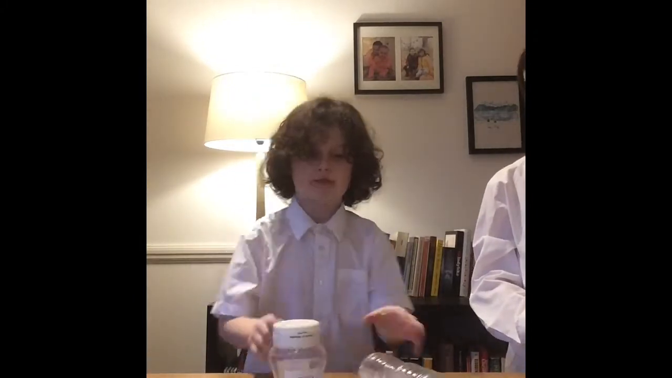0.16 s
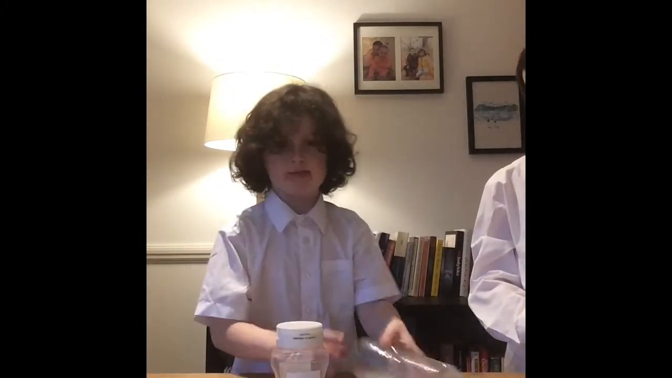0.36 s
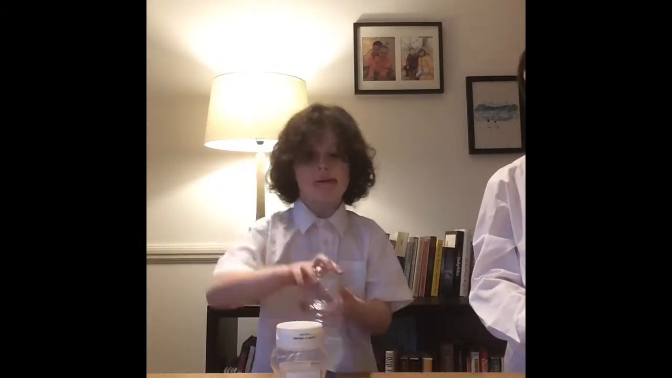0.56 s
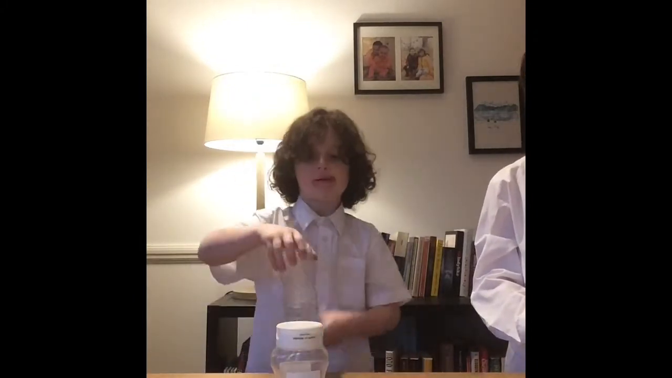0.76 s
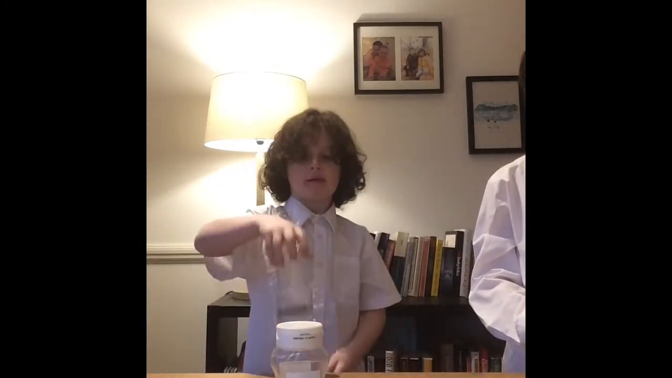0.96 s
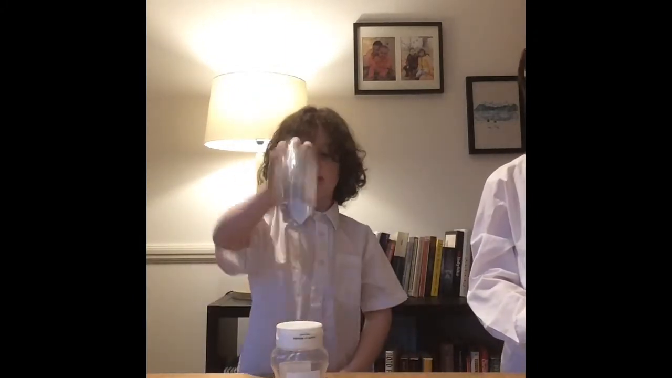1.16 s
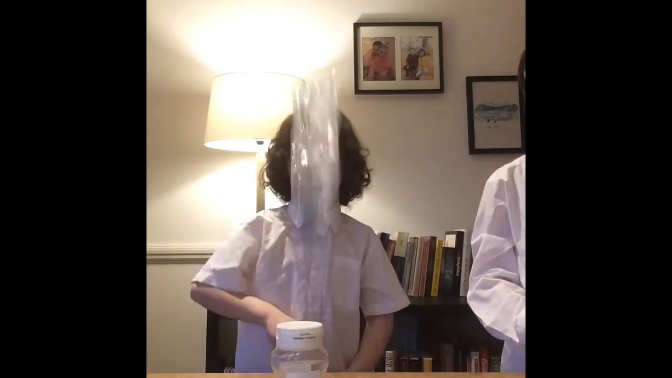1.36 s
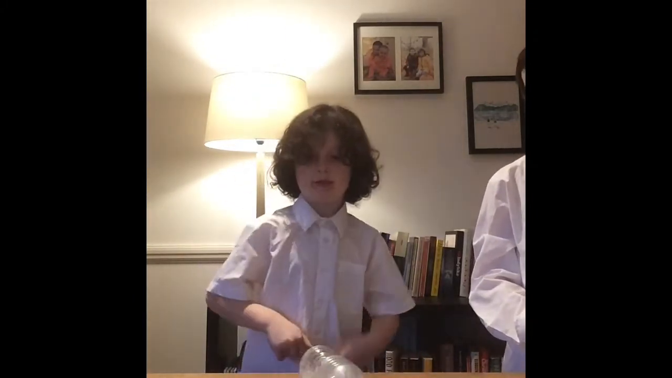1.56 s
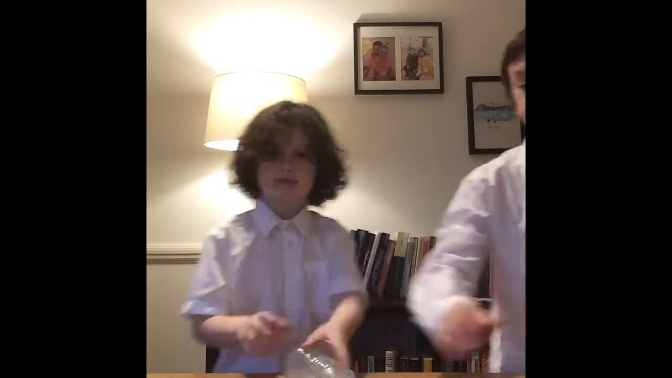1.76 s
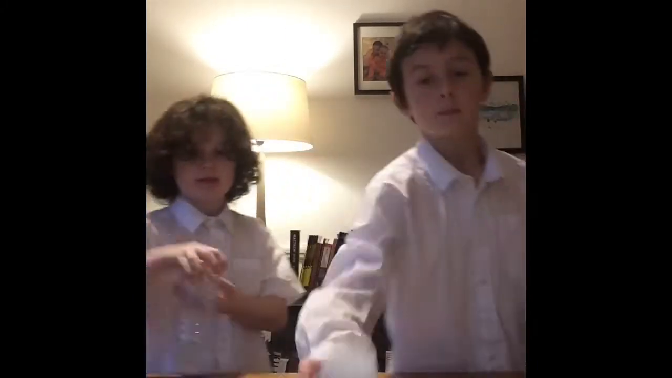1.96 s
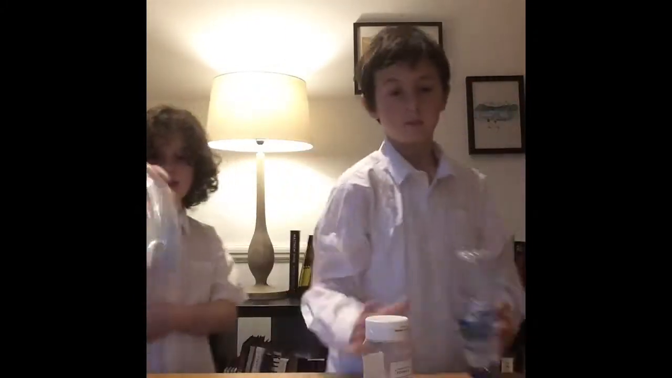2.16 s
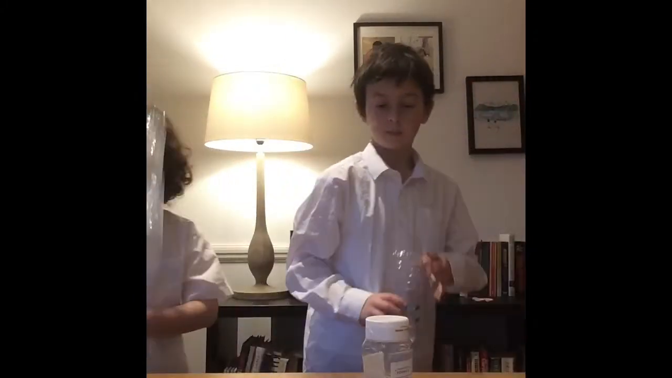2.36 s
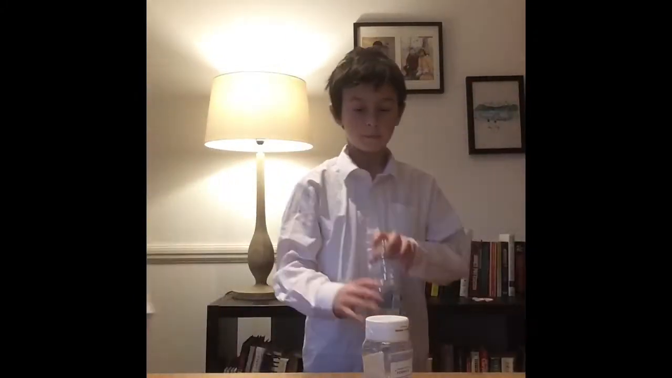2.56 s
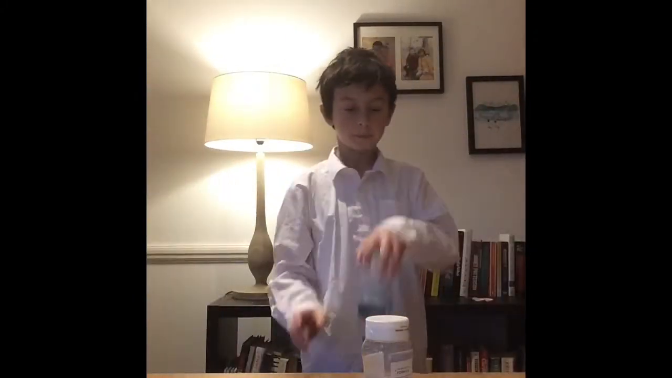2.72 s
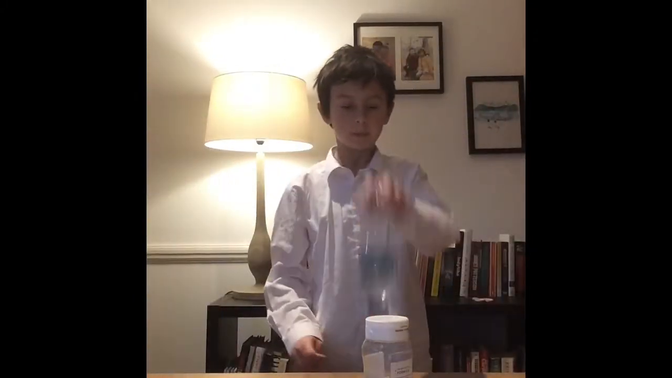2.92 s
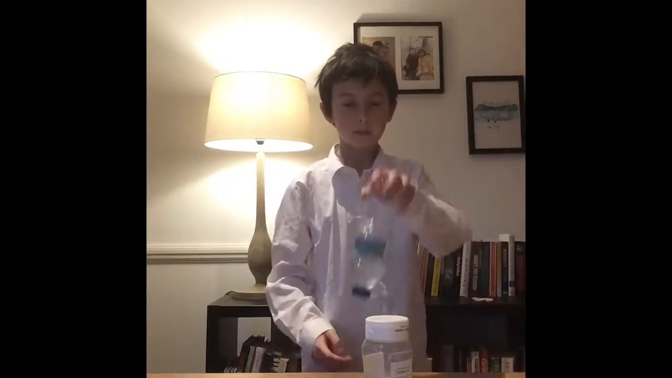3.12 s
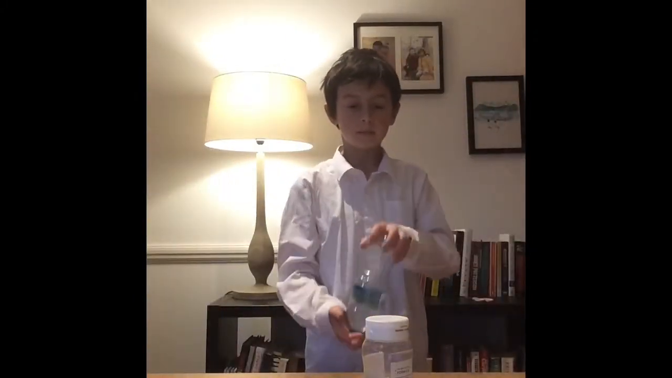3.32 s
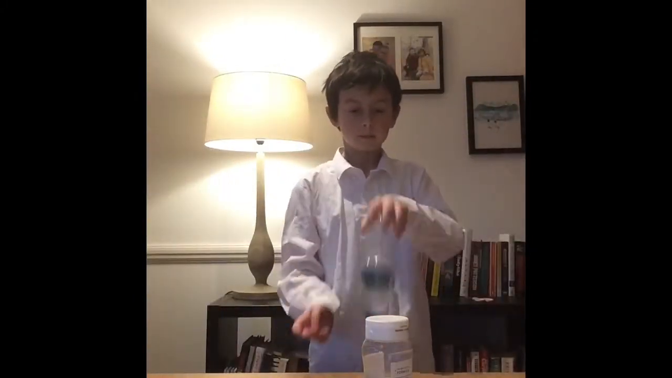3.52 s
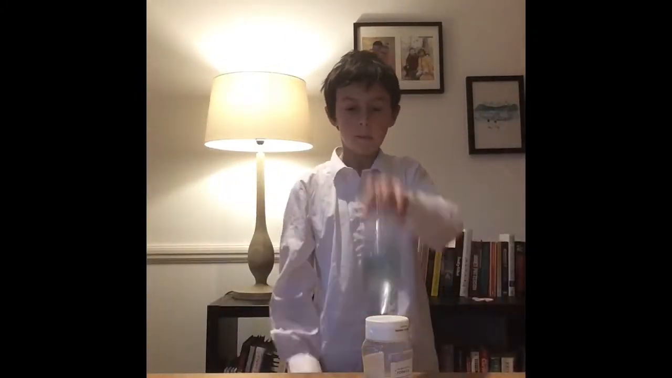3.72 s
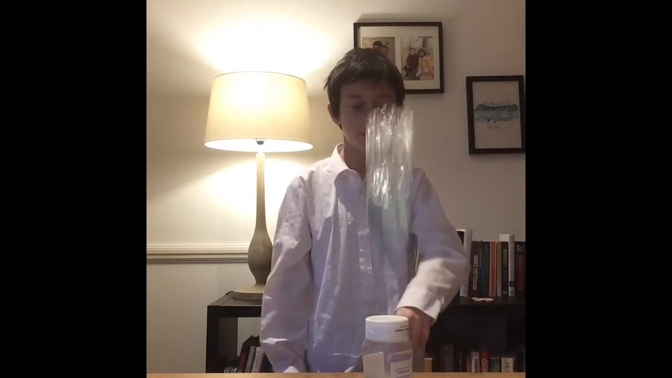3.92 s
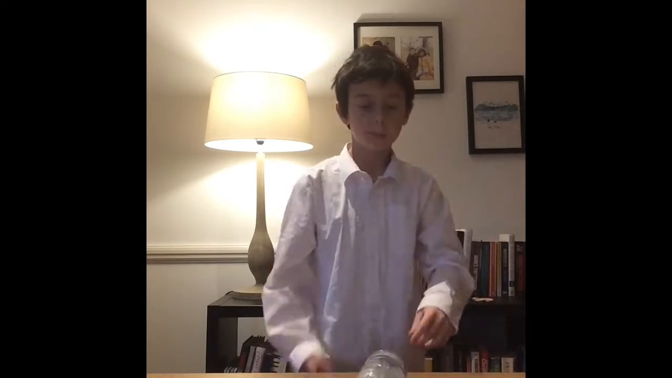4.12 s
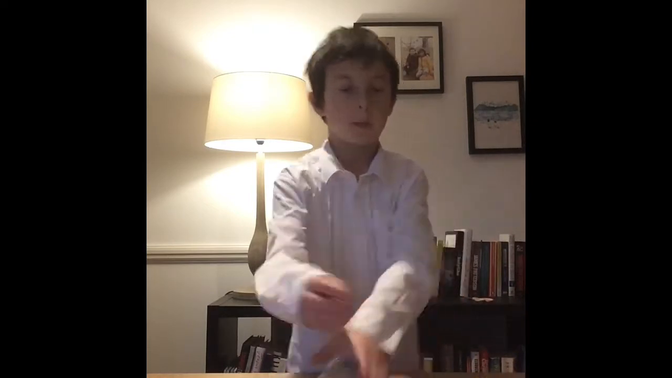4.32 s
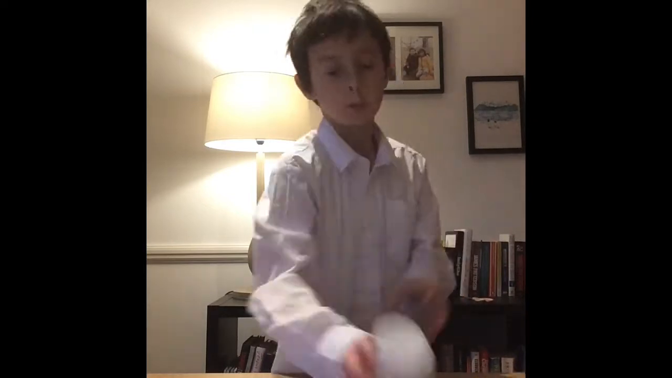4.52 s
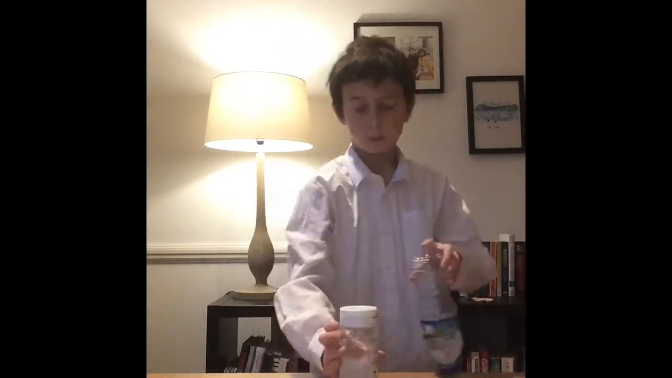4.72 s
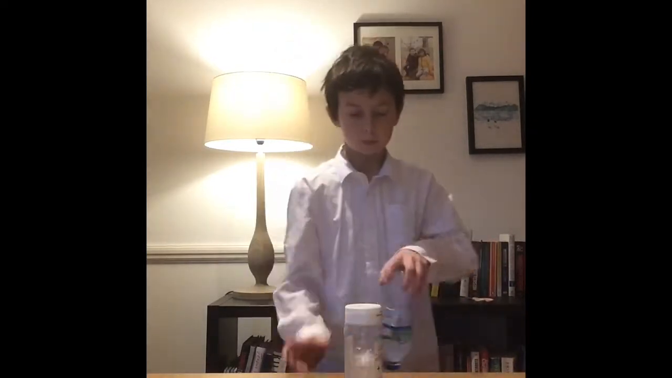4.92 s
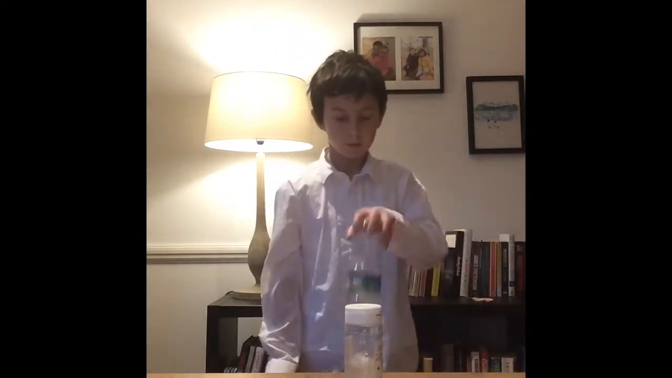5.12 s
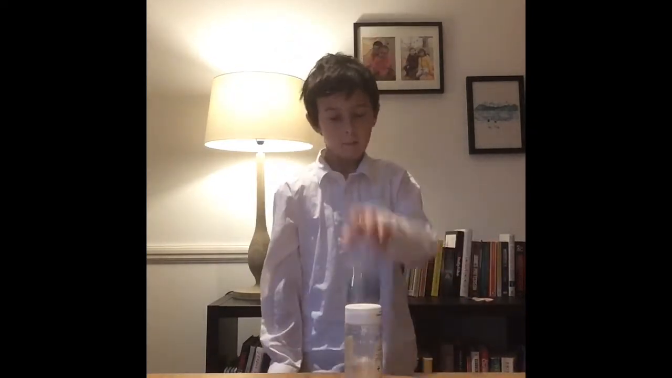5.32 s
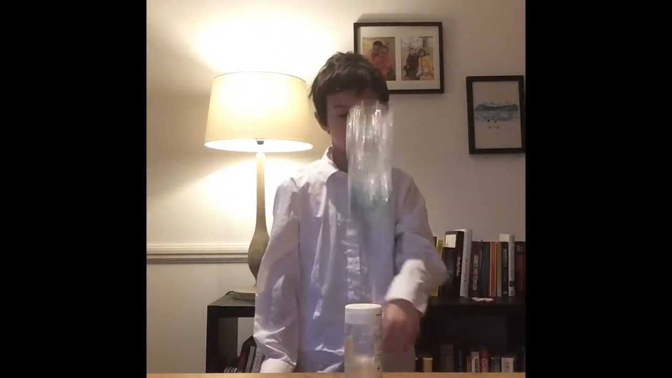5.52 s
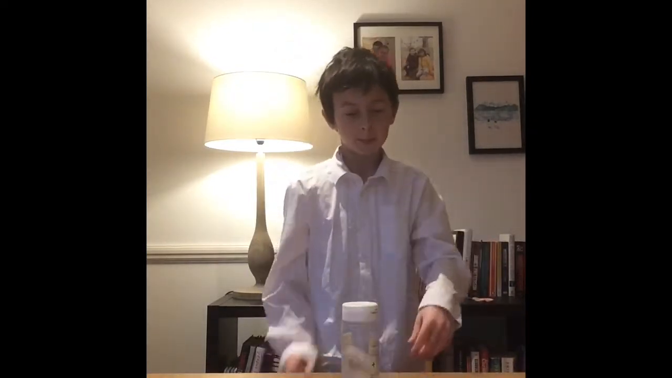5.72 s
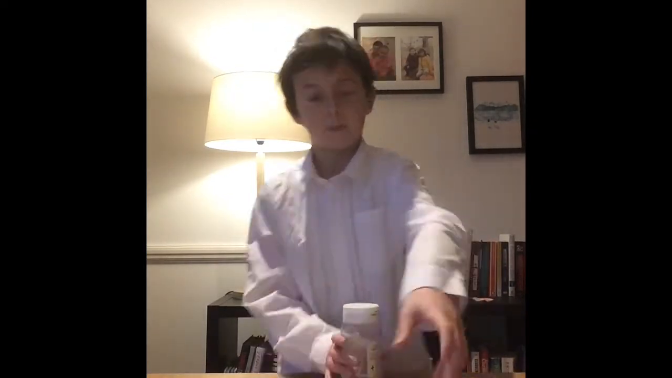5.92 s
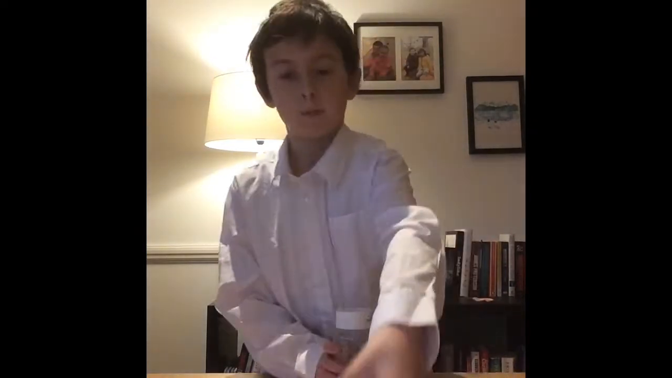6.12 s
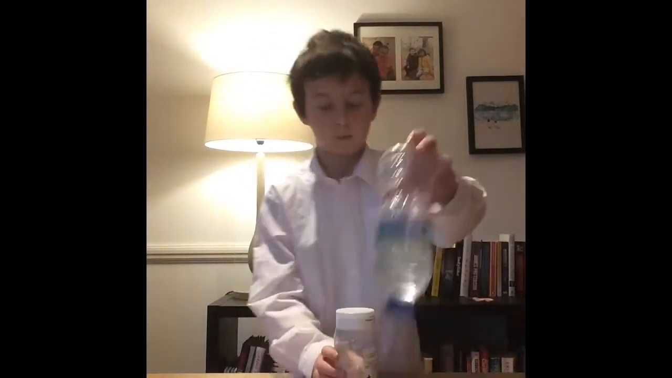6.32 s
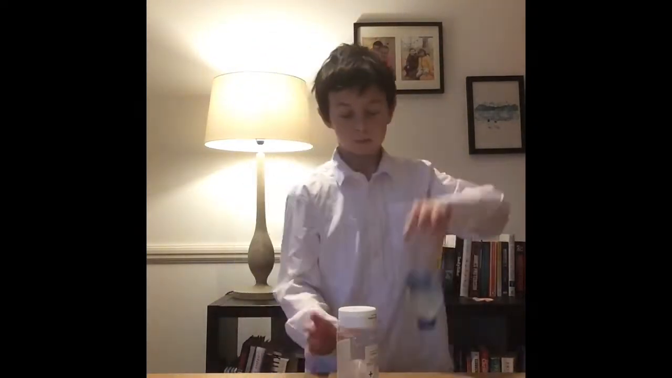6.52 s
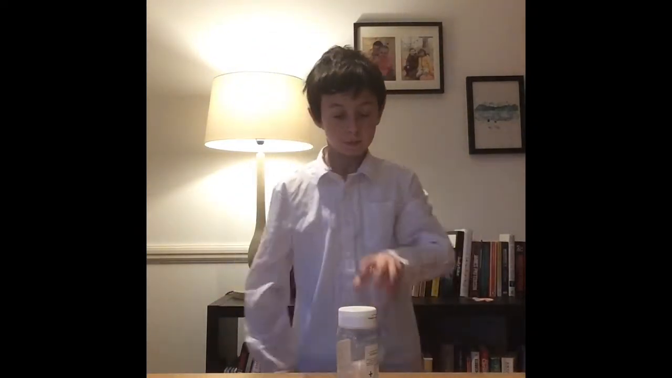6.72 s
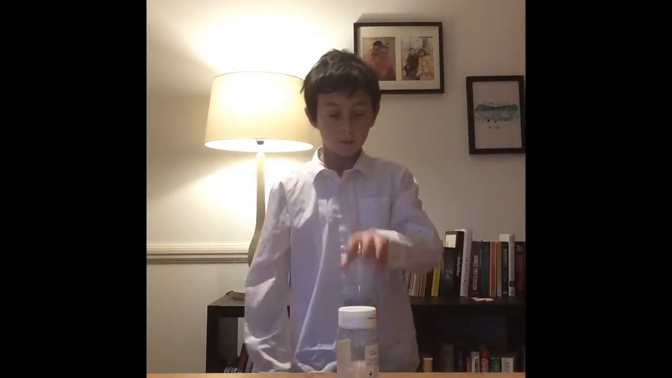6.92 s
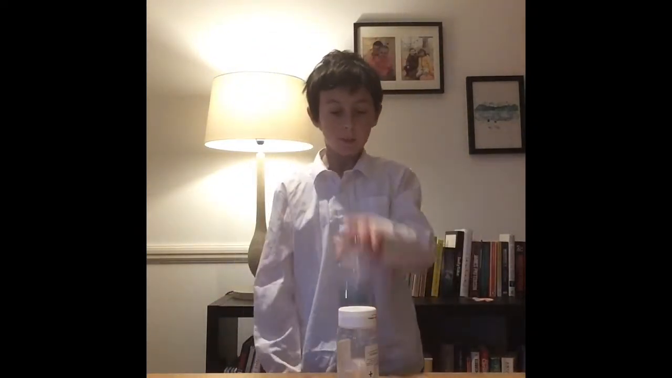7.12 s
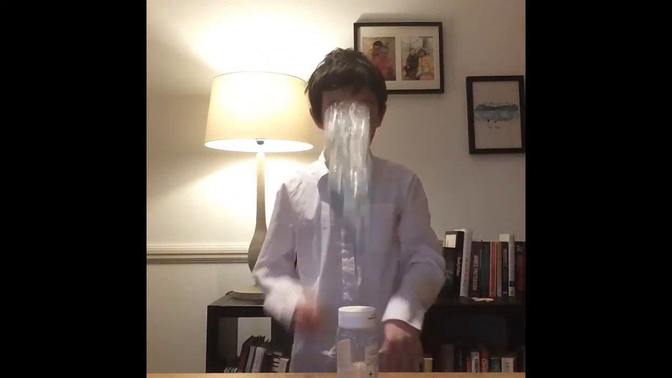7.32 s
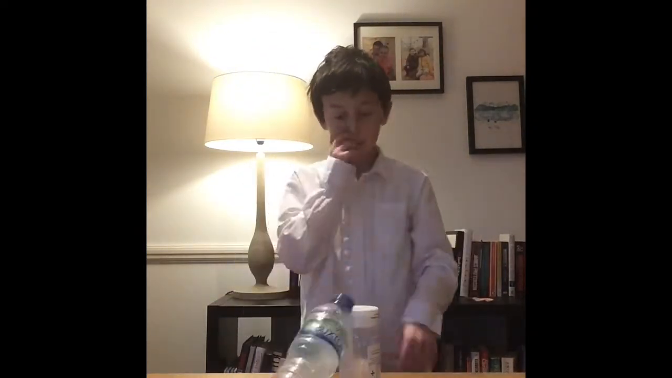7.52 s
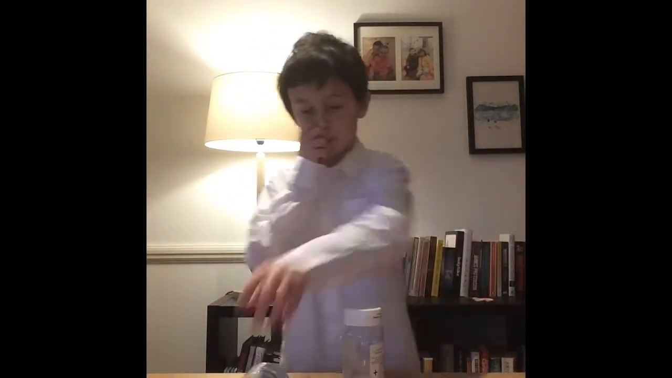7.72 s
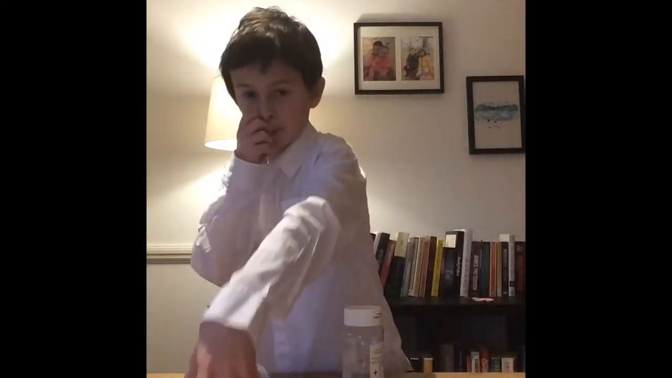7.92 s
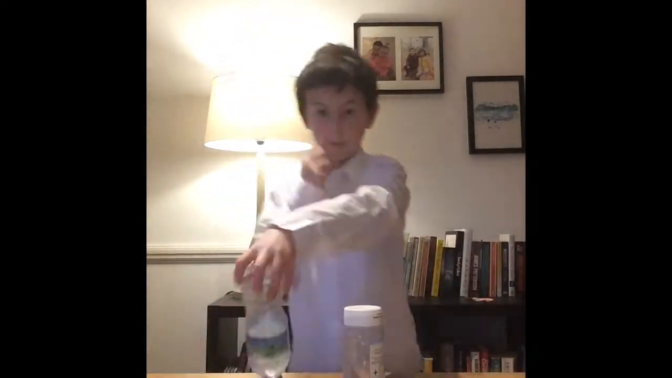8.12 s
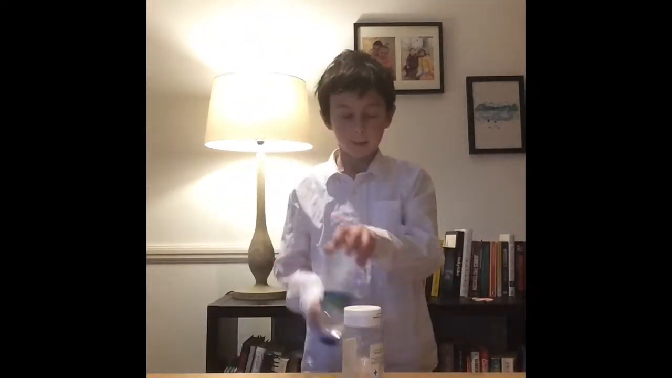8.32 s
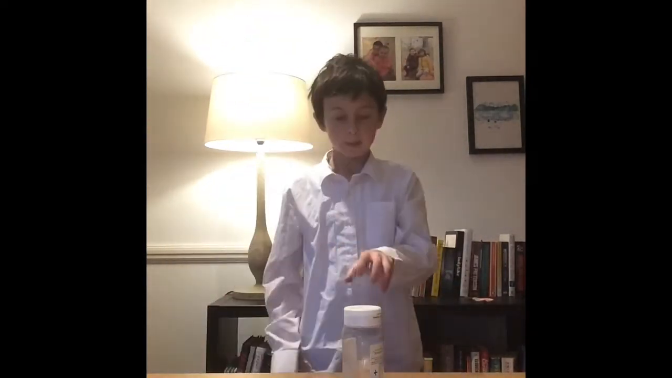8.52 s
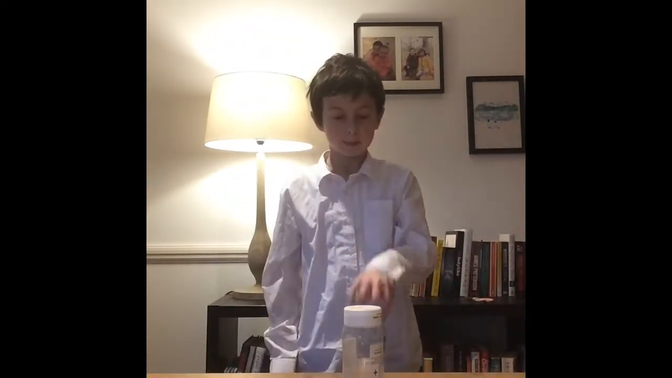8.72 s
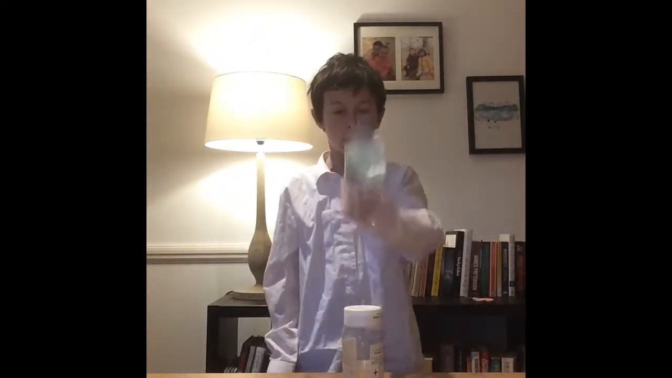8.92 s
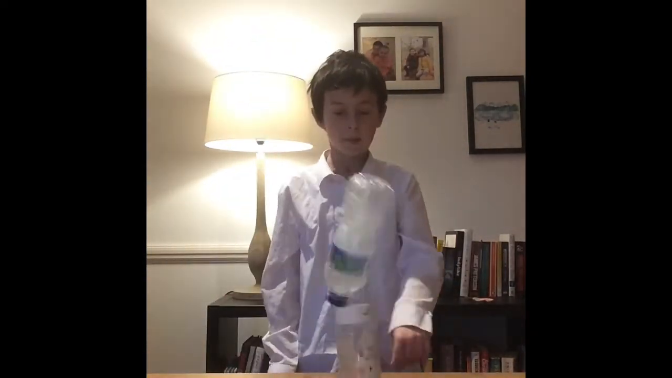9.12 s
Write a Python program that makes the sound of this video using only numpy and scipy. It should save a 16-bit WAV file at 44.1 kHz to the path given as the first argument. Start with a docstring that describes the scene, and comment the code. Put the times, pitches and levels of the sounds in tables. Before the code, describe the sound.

Hard knocks of water bottles on wood, spaced by faint sloshes, small plastic crinkles and soft rustling in a furnished room.

```python
"""A part-filled plastic bottle lands on a wooden table at once: damped modes and tiny shocks thump, knock, crackle.
Hard landings leave something on the table ringing, a faint sine; the bottle rocks, and hands nudge and squeeze it.
Water plips as it settles; at each flip it sloshes, with gulps and splashes of tiny shocks in coloured noise.
Two children flip, land and pick up again in a living room of air noise, hum and echo, the room's decaying noise
tail; as they swap places, floor rumble and sleeve rustle swell and fade."""
import sys
import numpy as np
from scipy import signal
from scipy.fft import rfft, irfft, next_fast_len
from scipy.io import wavfile
from scipy.ndimage import uniform_filter1d, map_coordinates

SR = 44100
rng = np.random.default_rng(int(sys.argv[2]) if len(sys.argv) > 2 else 0)


def put_to_file(sound):
    """Save the sound as 16-bit audio at rate SR, in the file named by the first command-line argument."""
    columns = np.atleast_2d(sound).T  # one column per channel
    safe = np.clip(columns, -1, 1)
    whole_steps = np.round(safe * 32767)
    wavfile.write(sys.argv[1], SR, whole_steps.astype(np.int16))


N = 403956
CLOCK = np.arange(N) / SR  # seconds through the scene
T = np.arange(-SR // 10, SR // 2) / SR  # seconds around one contact

# Contact times are peaks. pitch_hz centres the knock's emphasis; rattle_t60_s is the base decay, scaled per layer.
# thump_db throughout is before a shared trim of -0.6 dB.
# A bottle striking the table or a catching hand:
# start_s, pitch_hz, knock_db, thump_db, clatter_db, crackle_db, rattle_t60_s
LANDINGS = [(0.004, 456, -25, -26, -31.5, -37.5, 0.16), (0.19, 276, -35.5, -38, -40.5, -56.5, 0.077),
            (1.472, 370, -40.5, -52, -41, -42.5, .1), (1.494, 350, -17, -22, -24.5, -30.5, 0.15),
            (1.562, 370, -37, -37, -38, -41, .13), (2.086, 388, -30, -36.5, -39.5, -56, 0.17),
            (2.485, 359.4, -18, -22, -25.5, -32, 0.2), (2.507, 370, -32.5, -38, -27, -32, 0.088),
            (2.946, 740, -18, -35, -28.5, -38.5, 0.15), (4.033, 371, -21.5, -33.5, -25.5, -30.5, .13),
            (4.047, 386, -17, -27, -29.5, -38.5, 0.22), (4.113, 440, -28, -34.5, -29.5, -44.5, .13),
            (5.621, 364, -17, -25.5, -28, -36.5, .11), (5.663, 395, -15.5, -32, -25.5, -35.5, .16),
            (5.795, 376, -33, -44, -41, -48, 0.23), (5.826, 360, -45.5, -45, -61, -57, 0.19),
            (6.227, 467, -37, -48, -61.5, -64, 0.14), (7.421, 365, -22, -28.5, -34, -37.5, 0.11),
            (7.435, 337, -19.5, -25.5, -33.5, -40, 0.15), (7.541, 293, -35, -37, -41, -48, 0.23),
            (7.657, 370, -31.5, -39.5, -31.5, -40, .14), (7.741, 384, -28.5, -26.5, -44, -59, 0.14),
            (9.158, 704, -24.5, -32, -29.5, -35.5, .13)]
# A fallen bottle rocking to rest; levels of the first contact, then the loss per further contact:
# start_s, pitch_hz, knock_db, thump_db, clatter_db, crackle_db, gap_s, loss_db
ROCKING_BOTTLES = [(0.229, 600, -36, -37.5, -45.5, -59, .038, 6.7),
                   (1.614, 440, -24, -30.5, -29.5, -45, .031, 6.2),
                   (4.16, 400, -32.5, -34.5, -45.5, -56, 0.037, 7.1),
                   (4.661, 328, -35.5, -37.5, -51.5, -65, .03, 3.4),
                   (7.584, 338, -34.5, -49, -45, -57.5, .021, 2.8)]
# Hands nudging and lifting a bottle off the wood: start_s, pitch_hz, knock_db, thump_db, crackle_db
HAND_NUDGES = [(0.485, 393, -43.5, -72, -79), (0.527, 403, -50, -71, -69), (0.622, 270, -56.5, -61, -93),
               (1.875, 312, -49.5, -48, -69), (1.945, 516, -45.5, -49.5, -85), (1.98, 397, -47.5, -52, -67),
               (2.13, 348, -50, -55, -63), (2.272, 379.6, -52.5, -65, -67.5),
               (4.48, 392, -69.5, -49.5, -82), (4.552, 736, -45.5, -68, -75), (4.581, 350, -42, -59, -66.5),
               (8.03, 566, -47.5, -58, -90.5), (8.63, 379, -62, -71, -81), (8.724, 432, -51.5, -53.5, -68)]
# Fingers crinkling the thin wall: start_s, crackle_db
WALL_SQUEEZES = [(1.9, -64.5), (2.03, -57.5), (2.328, -58), (2.683, -65.5), (3.09, -65.5), (6.31, -65),
                 (8.191, -63), (8.401, -67.5)]
# A flick slapping the water about inside the bottle; levels of the first slap, gap between slaps:
# start_s, gulp_db, splash_db, gap_s
WATER_FLIPS = [(1.259, -45, -60.5, 0.036), (3.859, -51.5, -60, 0.038), (5.468, -55.5, -61.5, 0.021),
               (7.274, -51, -58.5, 0.023), (8.995, -52.5, -61.5, .037)]
# Small plips of the water settling: start_s, pitch_hz, level_db
WATER_PLIPS = [(0.531, 5330, -66), (3.133, 1955, -58.5), (3.944, 1750, -57.5), (6.214, 2810, -57),
               (7.358, 2890, -58), (5.32, 2780, -76.5), (7.396, 4310, -54), (7.809, 3840, -69),
               (8.365, 3330, -64.5)]
# Hard landings that set something on the table ringing: start_s, level_db (peak)
TABLE_RINGS = [(0, -54), (2.485, -55), (4.041, -45.5), (5.661, -48.5), (7.42, -49)]
# Children stepping and reaching; the span held at full level: start_s, length_s, rumble_db, rustle_db
CHILD_MOVES = [(0.1, 0.31, -73, -64), (1.9, 1.2, -58, -66.5), (4.45, .35, -71, -66),
               (5.896, .35, -63, -65.5), (7.95, 0.32, -68, -69), (8.62, 0.17, -73, -70.5)]

# Ringing modes, strength relative within a set, decay before each contact's damping: mode_hz, level_db, t60_s
# Bending of the table top
TABLE_MODES = [(64.4, -18.5, .2), (128, -0.5, 0.27), (162.4, -6.5, 0.32), (204, -2, 0.051)]
# A bottle on the wood
KNOCK_MODES = [(237.9, 2.5, 0.1), (307, 5.5, 0.044), (376, 3, 0.081), (440, -1.5, 0.047), (548, -6, 0.059),
               (586, -8, 0.18), (648, -3.5, .08), (829, -8.5, 0.088)]
# The thin bottle wall
WALL_MODES = [(962, 3.5, 0.069), (1069, 2, 0.1), (1335, -3.5, 0.23), (1574, -4.5, .09), (1874, -5, 0.18),
              (2660, -6, .11), (2790, -1.5, 0.28), (3163, -2.5, 0.21)]
# The stiff ribs and base
RIB_MODES = [(3650, 0, .09), (3980, -1, .09), (4400, -3, .08), (4870, -3, .09), (5580, -7, .08)]

# Noise colours, only the shape counts: frequency_hz, gain_db
# The table's thud
THUD_COLOUR = [(20, -26), (50, -11.5), (80, -0.5), (130, -5), (210, -2.5), (330, -22.5), (700, -58)]
# The water's knock
WATER_KNOCK_COLOUR = [(110, -32), (220, -1), (400, -1), (650, -7.5), (950, -6), (1600, -32)]
# The wall's clatter
CLATTER_COLOUR = [(450, -48.5), (700, -2.5), (850, -6), (1400, -2.5), (1900, -4.5), (2800, -4),
                  (3500, -7.5), (4600, -44)]
# The crackle
CRACKLE_COLOUR = [(2400, -44), (3400, 3), (4000, 1), (4900, -0.5), (5300, -2), (8000, -3), (11000, -8),
                  (14000, -14.5), (16000, -21.5)]
# The water's gulp
GULP_COLOUR = [(120, -31), (280, -4), (420, 3), (560, -9), (800, -21), (1500, -49.5)]
# Still air
AIR_COLOUR = [(15, -30), (30, -17.5), (70, -13.5), (110, -12.5), (170, -14.5), (400, -25.5), (900, -34.5),
              (1500, -31.5), (4500, -36.5), (11000, -38.5), (15500, -46)]
# Footfalls through the floor
RUMBLE_COLOUR = [(20, -9), (52, -0.5), (70, -2), (90, 1), (130, 1), (220, -14), (500, -24), (1200, -55)]
# Rustling sleeves
CLOTH_COLOUR = [(150, -5.5), (350, 2.5), (900, -5.5), (2000, -10.5), (3800, -14.5), (7000, -19.5),
                (15000, -25.5)]

# Room hum: tone_hz, level_db (rms)
HUM_TONES = [(97, -72), (129, -79.5)]
# Decay of the furnished room: frequency_hz, t60_s
ROOM_DECAY = [(100, 0.38), (300, 0.34), (1000, 0.18), (4000, 0.31), (14000, 0.1)]

TOP_HZ = 15700  # centre of the recorder's upper band limit
AIR_DB, REST_RUSTLE_DB, ROOM_DB = -71.5, -76, -23.5  # still air; sleeves between moves; room tail gain
MOVE_RISE_DB_PER_S, MOVE_FALL_DB_PER_S = 38.5, 26
RING_HZ, RING_T60_S = 527.6, 1.5
THUMP_TRIM_DB = -0.6
TILT_DB, TILT_GROWS = -1, 0.28  # clatter dB per octave at crackle = clatter; change per dB of crackle
EDGE_HZ, EDGE_HALVES_DB = 6500, 16  # clatter's upper edge at crackle = clatter; this much less crackle halves it
DENT_DB, DENT_SPACING_HZ, DENT_FADE_HZ = 3.5, 127.3, 5000  # ripple size and spacing; it evens out above the last
ROCK_T60_S, NUDGE_T60_S, SQUEEZE_T60_S = 0.19, 0.19, 0.15  # base rattle decays
SOFTEN_DB = 2.5  # extra crackle loss at each further rock
NUDGE_CLATTER_DB = -14.5  # over the knock
SQUEEZE_HZ = 420  # centre of the knock's emphasis
SQUEEZE_KNOCK_DB, SQUEEZE_THUMP_DB, SQUEEZE_CLATTER_DB = -0.5, 1, 1.5  # over the crackle
BUBBLE_LEAD_S, BUBBLE_HZ, BUBBLE_DB = 0.011, 2955, -3.5  # ahead of first slap; middle pitch; over the splash
GULP_LOSS_DB, SPLASH_GAIN_DB, SPRAY_DB = 7.5, 0.26, -1  # per further slap, twice; spray over the splash


def amp(db):
    """Decibels to gain."""
    return 10 ** (np.asarray(db) / 20)


def unit(x):
    """Scale to rms 1."""
    return x / np.sqrt(np.mean(x ** 2) + 1e-20)


def level(sound):
    """Scale to rms 1 around the moment of contact."""
    core = (T > -0.006) & (T < 0.010)
    return sound / np.sqrt(np.mean(sound[core] ** 2) + 1e-20)


def along(points, hz):
    """Read (Hz, value) points on a log frequency axis."""
    f, v = np.transpose(points)
    return np.interp(np.log(hz + 1), np.log(f + 1), v)


def filtered(x, response):
    """Shape x by a response of frequency."""
    m = next_fast_len(len(x) + SR // 10)
    spectrum = rfft(x, m) * response(np.fft.rfftfreq(m, 1 / SR))
    return irfft(spectrum, m)[:len(x)]


def coloured(x, colour):
    """Shape x by a (Hz, dB) colour."""
    return filtered(x, lambda f: amp(along(colour, f)))


def add(track, s, sound, db):
    """Mix in a sound whose contact falls at time s, with db the rms around that contact."""
    start = round((s + T[0]) * SR)
    lo, hi = max(start, 0), min(start + len(T), N)
    track[lo:hi] += amp(db) * level(sound)[lo - start:hi - start]


def swell(rise, t60):
    """An envelope that grows to a peak at the moment of contact and dies away."""
    return amp(-60 * np.where(T < 0, np.abs(T / rise) ** 1.08, T / t60))


def background():
    """Still air and hum; each move swells, holds and fades in footfall rumble and rustling sleeves."""
    rumble = np.zeros(N)
    rustle = np.full(N, amp(REST_RUSTLE_DB))
    for s, length, rumble_db, rustle_db in CHILD_MOVES:
        rise_db = MOVE_RISE_DB_PER_S * (CLOCK - s)
        fall_db = MOVE_FALL_DB_PER_S * (s + length - CLOCK)
        fade_db = np.minimum(0, np.minimum(rise_db, fall_db))
        rumble = np.maximum(rumble, amp(rumble_db + fade_db))
        rustle = np.maximum(rustle, amp(rustle_db + fade_db))
    noise = lambda colour: unit(coloured(rng.standard_normal(N), colour))
    hum = sum(amp(db) * np.sqrt(2) * np.sin(2 * np.pi * hz * CLOCK) for hz, db in HUM_TONES)
    return amp(AIR_DB) * noise(AIR_COLOUR) + hum + rumble * noise(RUMBLE_COLOUR) + rustle * noise(CLOTH_COLOUR)


def ringing():
    """A faint lasting tone: each hard landing adds fresh energy that decays exponentially."""
    envelope = np.zeros(N)
    for s, db in TABLE_RINGS:
        envelope += amp(db - 60 * np.abs(CLOCK - s) / RING_T60_S) * (CLOCK > s)
    return envelope * np.sin(2 * np.pi * RING_HZ * CLOCK)


def ring(modes, rise, detune, sustain, weight=lambda hz: 0):
    """Damped modes, a little different in pitch, strength and phase at each contact."""
    out = np.zeros(len(T))
    draws = rng.standard_normal((len(modes), 3))
    for (hz, db, t60), (strength, pitch, phase) in zip(modes, draws):
        tone = np.sin(2 * np.pi * hz * (1 + detune * pitch) * T + phase)
        out += amp(db + weight(hz) + 1.4 * strength) * swell(rise, t60 * sustain) * tone
    return level(out)


def crumple(colour, rise, t60, grain_db, snap=0):
    """Many tiny shocks of water and thin plastic, around one firm snap if asked for."""
    grain = unit(uniform_filter1d(rng.standard_normal(len(T)), size=24))
    shocks = swell(rise, t60) * amp(grain_db * grain) * rng.standard_normal(len(T))
    impulse = snap * (T == 0)
    return level(coloured(shocks / np.linalg.norm(shocks) + impulse, colour))


def dented(x):
    """Each contact dents the wall differently, giving it its own close resonances."""
    knots = rng.standard_normal(400)
    ripple = lambda f: map_coordinates(knots, [f / DENT_SPACING_HZ], mode="mirror")
    return filtered(x, lambda f: amp(DENT_DB * ripple(f) / (1 + (f / DENT_FADE_HZ) ** 2)))


def table_thump(rise, t60, loose, grain_db):
    """The table top bends in a few low modes under a loose thud."""
    bending = ring(TABLE_MODES, rise * 0.65, detune=0.0093, sustain=0.93)
    return bending + 0.58 * loose * crumple(THUD_COLOUR, rise, t60 * 1.4, grain_db)


def bottle_knock(pitch, rise, t60, sustain, loose, grain_db, snap, focus_db):
    """The spot that is struck picks which modes of bottle and water speak."""
    spot = lambda hz: -focus_db * np.log2((hz + 1) / pitch) ** 2
    water = crumple(WATER_KNOCK_COLOUR, rise, t60, grain_db, snap)
    water = level(filtered(water, lambda f: amp(spot(f))))
    return ring(KNOCK_MODES, rise, detune=0.013, sustain=sustain, weight=spot) + loose * water


def wall_clatter(hardness_db, rise, t60, sustain, grain_db, snap, wall):
    """The thin wall rattles; hard contact brightens it, soft contact dulls it."""
    tilt_db = TILT_DB + TILT_GROWS * hardness_db
    edge_hz = EDGE_HZ * 2 ** (hardness_db / EDGE_HALVES_DB)
    modes = wall * ring(WALL_MODES, rise, detune=0.02, sustain=sustain)
    clatter = modes + crumple(CLATTER_COLOUR, rise, t60, grain_db, snap)
    tilt = lambda f: amp(tilt_db * np.log2(np.clip(f, 700, 4000) / 1500))
    return dented(filtered(clatter, lambda f: tilt(f) / np.hypot(1, (f / edge_hz) ** 4)))


def wall_crackle(crackle_db, rise, t60, sustain, grain_db, snap):
    """Buckling plastic excites the stiff ribs; louder crackle is brighter at the very top."""
    sharp_db = 1.6 * np.clip(crackle_db + 35.0, -3, 3)  # dB per octave above 7 kHz
    buckling = crumple(CRACKLE_COLOUR, rise * 1.1, t60 * 0.95, grain_db, snap * 0.4)
    crackle = buckling + 0.33 * ring(RIB_MODES, rise, detune=0.006, sustain=sustain)
    return dented(filtered(crackle, lambda f: amp(sharp_db * np.log2(np.maximum(f, 7000) / 7000))))


def contacts(rows, rise, loose, grain_db, snap, focus_db, wall):
    """Each contact thumps the table, knocks the bottle and makes its wall clatter and crackle."""
    out = np.zeros(N)
    for s, pitch, knock_db, thump_db, clatter_db, crackle_db, t60 in rows:
        hardness_db = crackle_db - clatter_db
        sustain = min(t60 / 0.18, 1.2)  # a contact that stops the rattle early also damps the modes
        thump = table_thump(rise, t60, loose, grain_db)
        knock = bottle_knock(pitch, rise, t60, sustain, loose, grain_db, snap, focus_db)
        clatter = wall_clatter(hardness_db, rise, t60, sustain, grain_db, snap, wall)
        crackle = wall_crackle(crackle_db, rise, t60, sustain, grain_db, snap)
        add(out, s, thump, thump_db + THUMP_TRIM_DB)
        add(out, s, knock, knock_db)
        add(out, s, clatter, clatter_db)
        add(out, s, crackle, crackle_db)
    return out


def room(x):
    """The furnished room answers 10 ms later, each frequency dying at its own speed."""
    hz, t, z = signal.stft(rng.standard_normal(SR), SR, nperseg=256)
    decay = amp(-60 * t / along(ROOM_DECAY, hz)[:, None])
    tail = signal.istft(z * decay, SR, nperseg=256)[1]
    echo = np.pad(tail / np.linalg.norm(tail), (SR // 100, 0))
    return signal.fftconvolve(x, echo)[:N]


def rocks(count):
    """A fallen bottle touches the wood a few times, ever weaker and softer."""
    rows = []
    for s, pitch, knock_db, thump_db, clatter_db, crackle_db, gap, loss_db in ROCKING_BOTTLES:
        for k in range(count):
            lost_db = k * loss_db
            rows.append((s + k * gap, pitch, knock_db - lost_db, thump_db - lost_db, clatter_db - lost_db,
                         crackle_db - lost_db - k * SOFTEN_DB, ROCK_T60_S))
    return rows


def touches():
    """Nudges are soft contacts of bottle and wood; squeezes flex the thin wall."""
    nudges = [(s, pitch, knock_db, thump_db, knock_db + NUDGE_CLATTER_DB, crackle_db, NUDGE_T60_S)
              for s, pitch, knock_db, thump_db, crackle_db in HAND_NUDGES]
    squeezes = [(s, SQUEEZE_HZ, db + SQUEEZE_KNOCK_DB, db + SQUEEZE_THUMP_DB, db + SQUEEZE_CLATTER_DB, db,
                 SQUEEZE_T60_S) for s, db in WALL_SQUEEZES]
    return nudges + squeezes


def bubble(hz):
    """A short fuzzy plip: tiny shocks narrowed around one pitch."""
    band = [(hz * 0.6, -45), (hz * 0.73, -11), (hz, 0), (hz * 1.18, -11), (hz * 1.4, -45)]
    return crumple(band, rise=0.067, t60=0.11, grain_db=-0.5)


def slosh(count):
    """Water slaps the far end of the bottle: a hollow gulp, a splash on the wall, small bubbles."""
    out = np.zeros(N)
    for s, hz, db in WATER_PLIPS:
        add(out, s, bubble(hz), db)
    for start, first_gulp_db, first_splash_db, gap in WATER_FLIPS:
        bubble_hz = BUBBLE_HZ * np.exp(0.21 * rng.standard_normal())
        add(out, start - BUBBLE_LEAD_S, bubble(bubble_hz), first_splash_db + BUBBLE_DB)
        for k in range(count):
            s = start + k * gap
            gulp_db = first_gulp_db - k * GULP_LOSS_DB
            splash_db = first_splash_db + k * SPLASH_GAIN_DB
            gulp = crumple(GULP_COLOUR, rise=0.055, t60=0.11, grain_db=0.5)
            splash = dented(crumple(CLATTER_COLOUR, rise=0.094, t60=0.17, grain_db=5.5))
            spray = crumple(CRACKLE_COLOUR, rise=0.12, t60=0.087, grain_db=2.0)
            add(out, s, gulp, gulp_db)
            add(out, s, splash, splash_db)
            add(out, s, spray, splash_db + SPRAY_DB)
    return out


def scene():
    """Bottles, hands, water and room at one microphone."""
    landings = contacts(LANDINGS + rocks(count=3), rise=0.062, loose=0.88, grain_db=-0.5, snap=0.22,
                        focus_db=9.0, wall=0.29)
    hands = contacts(touches(), rise=0.096, loose=1.5, grain_db=1.5, snap=0.15, focus_db=11.5, wall=0.46)
    near = landings + hands + slosh(count=3)
    return (near + amp(ROOM_DB) * room(near) + ringing() + background())[None]


def record(dry):
    """The recorder rolls off over 200 Hz around its band limit and keeps nothing above."""
    return filtered(dry[0], lambda f: np.clip((TOP_HZ - f) / 200 + 0.5, 0, 1))[None]


dry = scene()
out = record(dry)
put_to_file(out)
```